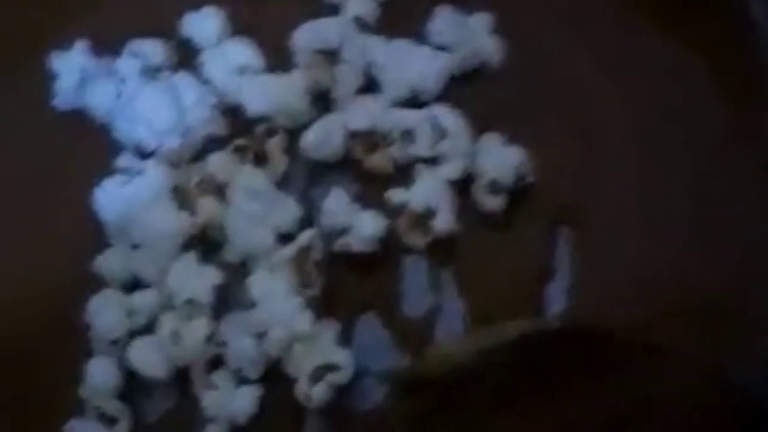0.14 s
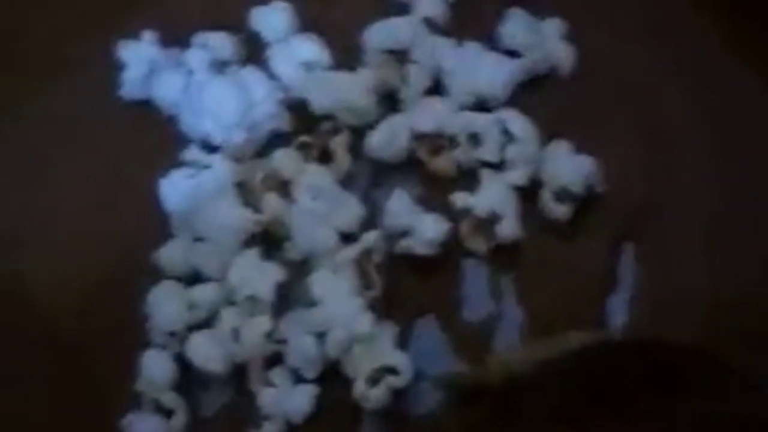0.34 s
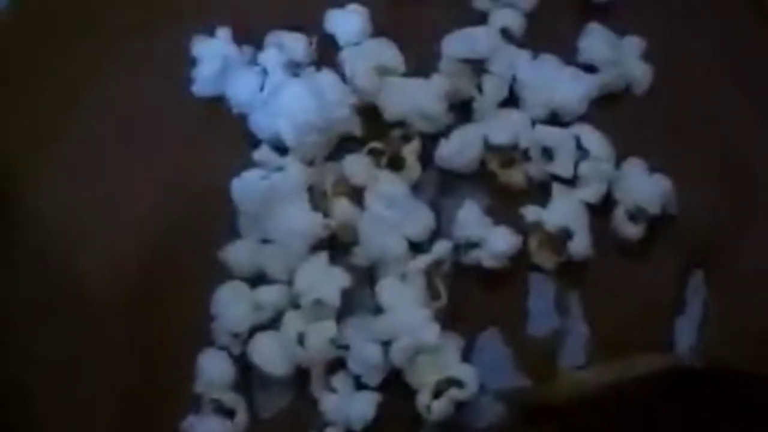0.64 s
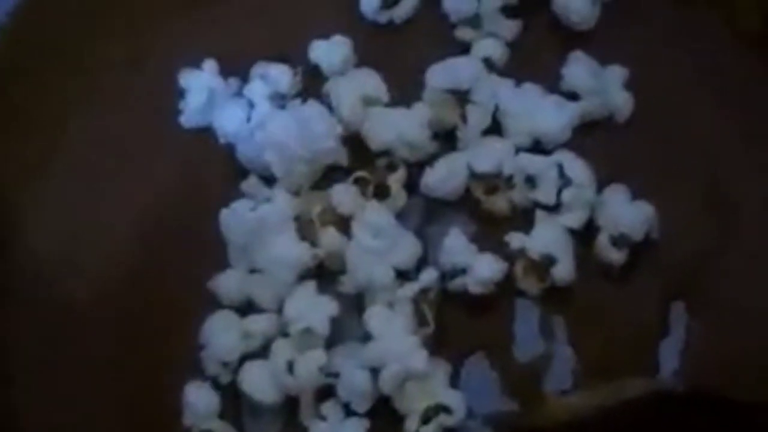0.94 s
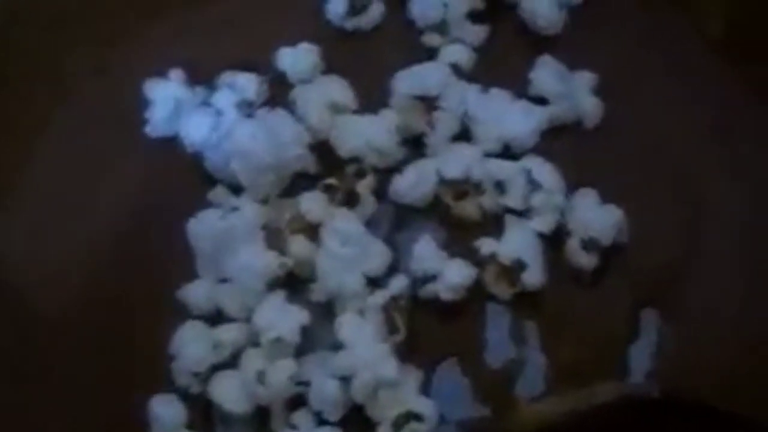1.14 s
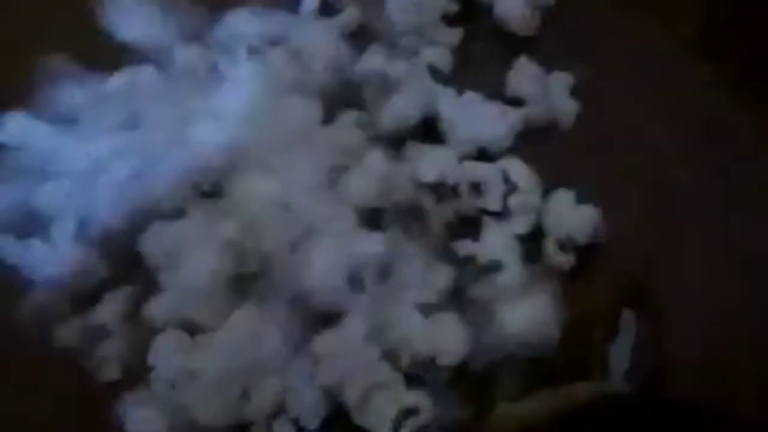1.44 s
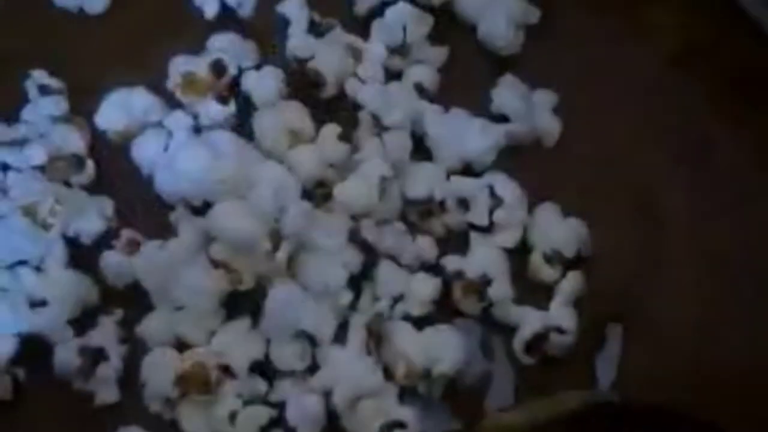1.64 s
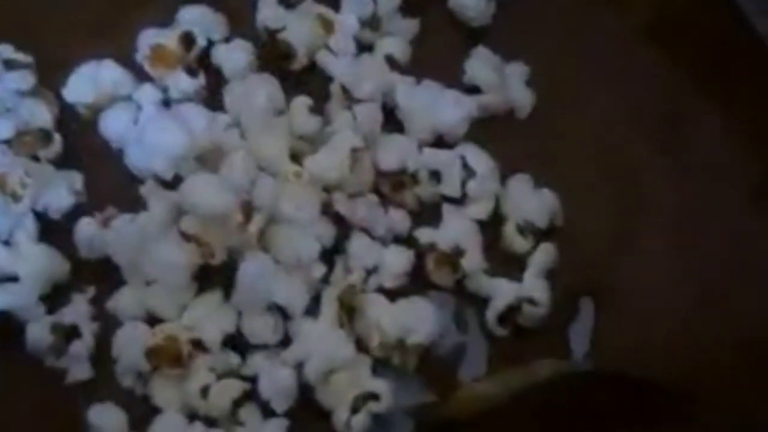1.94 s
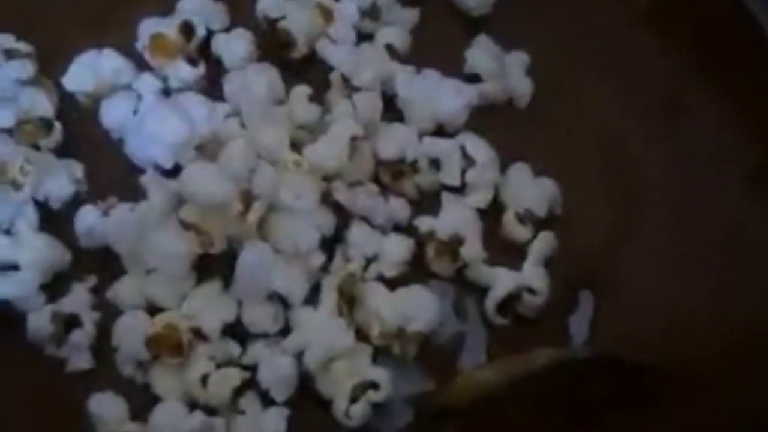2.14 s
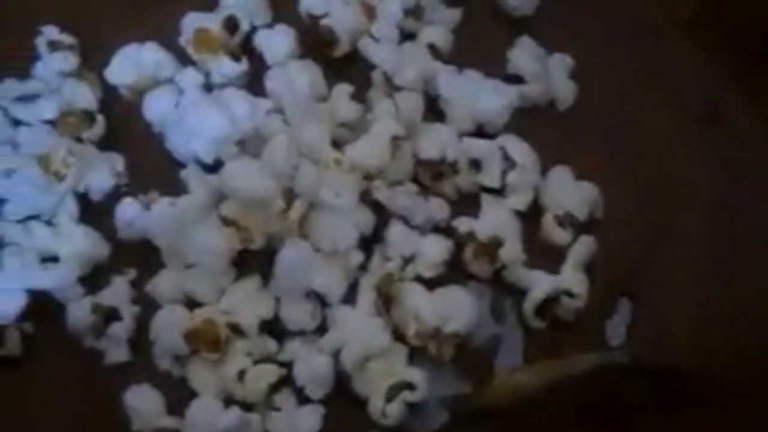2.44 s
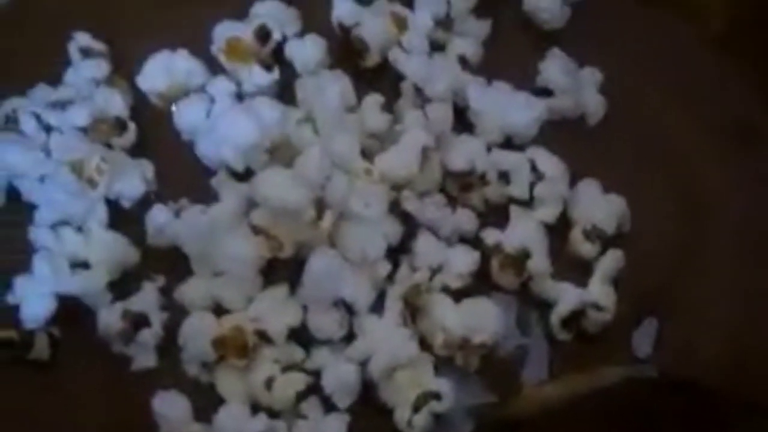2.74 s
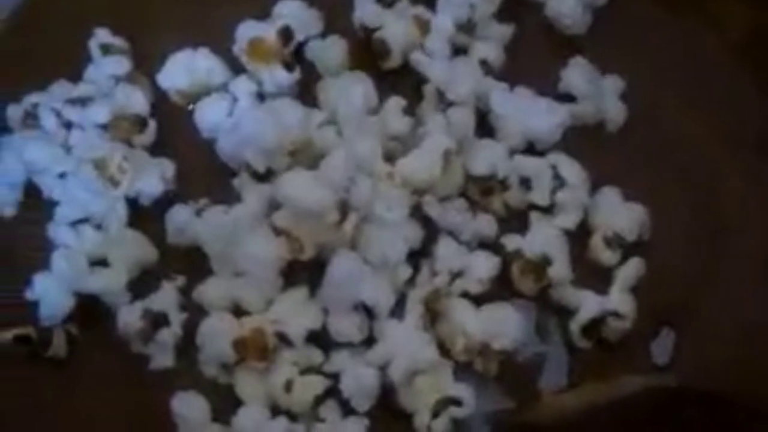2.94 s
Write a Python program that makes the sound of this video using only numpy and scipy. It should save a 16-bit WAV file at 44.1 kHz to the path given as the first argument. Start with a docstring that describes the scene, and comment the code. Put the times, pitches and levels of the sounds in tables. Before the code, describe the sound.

Popcorn rustles and knocks as it is scooped from a metal pot and dropped into a bowl

```python
"""A lone piece lands in a deep bowl, then popcorn is scooped from a metal pot: dense random contacts rustle
and drum, noise bursts click and knock, all coloured by the pot's resonances, and one kernel squeaks.
A handful then drops into the bowl: cracks excite hollow, damped modes. A second scoop follows.
Low thumps go with both scoops. A short diffuse room tail and steady noise last throughout; the sound is
that of a quiet kitchen through a dull, near-mono microphone."""
import sys
import numpy as np
from scipy import signal
from scipy.fft import rfft, irfft
from scipy.io import wavfile
from scipy.ndimage import uniform_filter1d

SR = 44100
rng = np.random.default_rng(int(sys.argv[2]) if len(sys.argv) > 2 else 0)


def field_ratio(decibels):
    """Amplitude ratio for a level in dB (20 dB per decade); scalars and array-likes work."""
    return 10 ** (np.asarray(decibels, dtype=float) / 20)


def dump_mix(stems):
    """Bounce the given channels to the path in sys.argv[1] as a 16-bit WAV at rate SR."""
    frames = np.atleast_2d(stems).T  # one column per channel
    limited = np.clip(frames, -1, 1)  # hard clip at full scale
    pcm = np.round(limited * 32767).astype(np.int16)
    wavfile.write(sys.argv[1], SR, pcm)


N = 136710  # samples, 3.1 s
HZ = np.fft.rfftfreq(4096, 1 / SR)  # frequencies at which filters are given

# Stirring effort, one list per scoop. Columns: t/s, RMS rustle level/dB, RMS drumming level/dB
STIRS = [
    [(.14, -89, -68), (.17, -51.5, -67.5), (.3, -53, -44.5), (.55, -56.5, -52), (.82, -56.5, -54.5),
     (.95, -54.5, -55.5), (1.02, -67, -58.5), (1.13, -72, -64.5), (1.4, -73, -79.5)],
    [(1.87, -76, -99), (1.93, -51, -64), (2.035, -59.5, -56), (2.2, -54.5, -56.5), (2.35, -57.5, -54.5),
     (2.55, -50, -46), (2.7, -59.5, -56), (2.86, -73, -59), (3.0, -83, -74)],
]
# Relative spectrum of the dry rustle, before the pot modes. Columns: f/Hz, density/dB
RUSTLE_SPECTRUM = [(710, -28.5), (1200, -4), (2380, -8.5), (2570, -6), (4670, 0.5), (6440, -5), (7900, -22),
                   (15500, -29)]
# Relative spectrum of the pot wall under drumming and knocks. Columns: f/Hz, density/dB
WALL_SPECTRUM = [(35, -73), (60, -28.5), (258, -15), (381, -19), (613, -3), (1640, -11), (2030, -22.5),
                 (3000, -25), (3900, -52), (6600, -120)]
# Pot resonances. Columns: f/Hz, width/Hz, strength of the peak against the unlifted spectrum/dB
POT_MODES = [(148, 4.4, 9), (629.2, 46, 7.5), (1140, 30, 7), (2320.5, 33, 12.5), (3870, 9.7, 4),
             (1798, 61, 4.5)]
# Crisp slips of kernels along the wall; the first 20 ms have an RMS 12 dB below the level.
# Columns: t/s, level/dB, centre f/Hz, length/s
SLIPS = [(0.1617, -49, 3600, 0.018), (0.2675, -26, 2460, 0.028), (0.3815, -38, 6350, 0.03),
         (0.4115, -33.5, 4940, 0.021), (0.505, -38, 6730, 0.048), (0.5745, -32, 6250, 0.017),
         (0.6035, -30.5, 5550, 0.028), (0.7417, -39.5, 6500, 0.053), (0.8603, -29, 5600, 0.03),
         (0.8976, -35, 4330, 0.028), (1.036, -37, 4000, 0.036), (1.921, -42, 5300, 0.1),
         (2.045, -39.5, 4800, 0.053), (2.067, -35, 4800, 0.014), (2.1005, -37, 4960, 0.0077),
         (2.147, -36, 3870, 0.025), (2.2346, -47, 4400, 0.035), (2.393, -38.5, 4760, 0.06),
         (2.4695, -36, 4480, 0.033), (2.541, -35.5, 3040, 0.009), (2.5501, -27.5, 6100, 0.017),
         (2.628, -30.5, 5560, 0.011), (2.7262, -38, 3700, 0.012), (2.779, -27.5, 5700, 0.024)]
# Relative spectrum of slips and of the crack of landing pieces. Columns: f/Hz, density/dB
SLIP_SPECTRUM = [(350, -39), (600, -1), (2040, -4.5), (2370, -4.5), (2680, -4.5), (6230, 1), (7740, -17),
                 (15500, -31)]
# Dull knocks of the scoop on the pot, level as for slips. Columns: t/s, level/dB, centre f/Hz
KNOCKS = [(0.224, -41, 1130), (0.264, -26, 398), (0.268, -28.5, 1660), (0.286, -45, 980), (0.419, -43, 610),
          (0.604, -37.5, 650), (0.919, -34, 664), (1.038, -39.5, 690), (2.3896, -31, 530),
          (2.392, -33, 1170), (2.469, -33, 600), (2.538, -30.5, 1600), (2.591, -34, 990), (2.617, -38, 650),
          (2.666, -35, 1030), (2.776, -47, 655), (2.832, -43, 740)]
# Pieces landing in the bowl. Columns: t/s, gain on crack and ring (level/dB), hardness from 0 to 1
DROPS = [(0.0988, -50.5, 0.86), (1.431, -52, 0.97), (1.4436, -42, 0.8), (1.4478, -39, 0),
         (1.4563, -41.5, 1), (1.464, -40.5, 1), (1.4696, -33, 0.95), (1.4845, -44, 0.86),
         (1.4883, -40.5, 0.93), (1.512, -40.5, 0.45), (1.5489, -50, 1), (1.613, -56, 1)]
# Bowl modes, before hardness and chance alter them. Columns: f/Hz, level/dB, T60/s
BOWL_MODES = [(468, 0, .17), (510, -14, .03), (865, -7, .035), (925, -5, .04), (1025, -7, .035),
              (1370, -5, .035), (1800, -9, .01), (2500, -11, .012)]
# Low thumps through the counter. Columns: t/s, level before the soft onset/dB, f/Hz
THUMPS = [(0.265, -37, 251.3), (0.266, -46, 398), (0.269, -47.5, 159), (0.92, -54, 160), (2.31, -54.5, 310),
          (2.391, -59, 69), (2.391, -48.5, 246)]
# One kernel squeaking on metal. Columns: t/s, length/s, f/Hz, peak level/dB
SQUEAK = (.78, .04, 1800, -50)
# Relative spectrum of the room's hush. Columns: f/Hz, density/dB
HUSH_SPECTRUM = [(12, -37), (20, -5), (157, -11), (1110, -11), (1960, -11.5), (2380, -8.5), (7000, -7.5),
                 (9100, -51), (15400, -120)]
# Relative spectrum of the preamplifier hiss. Columns: f/Hz, density/dB
PREAMP_SPECTRUM = [(3000, 0), (7500, -14.5), (8800, -3.5), (10300, -3), (15500, -6.5)]
# Relative spectrum of the faint steady noise that differs between left and right. Columns: f/Hz, density/dB
SIDE_SPECTRUM = [(3600, -40), (4600, 9), (7200, 5), (9000, 2), (15700, 1)]


def evened(x):
    """Normalisation: scales a signal to unit RMS."""
    return x / np.sqrt(np.mean(x ** 2) + 1e-20)


def read(points, hz):
    """Interpolation: reads a tabulated spectrum in dB along a logarithmic frequency axis."""
    f, value = np.transpose(points)
    return np.interp(np.log(hz + 1), np.log(f + 1), value)


def add(mix, s, sound):
    """Superposition: adds a sound to the mix from time s on, cut at the end of the mix."""
    part = mix[round(s * SR):][:len(sound)]
    part += sound[:len(part)]


def colour(x, db):
    """Minimum phase: a causal filter whose phase follows from its dB response on HZ by a Hilbert transform."""
    log_gain = np.log(field_ratio(np.maximum(db, -100)))
    full = np.r_[log_gain, log_gain[-2:0:-1]]
    phase = -signal.hilbert(full).imag
    taps = np.fft.ifft(np.exp(full + 1j * phase)).real[:2048]
    return signal.oaconvolve(x, taps)[:len(x)]


def pot_db():
    """Resonance: the peaks in dB that the pot's modes lift out of any spectrum."""
    lift = sum(field_ratio(db) ** 2 / (1 + (2 * (HZ - f) / width) ** 2) for f, width, db in POT_MODES)
    return 10 * np.log10(1 + lift)


def grains(per_s, spread_db):
    """Random impulses: contacts of random sign and size, swelling in clumps."""
    clump_s, clump_db = .025, 2.2
    clump = evened(uniform_filter1d(rng.standard_normal(N), int(clump_s * SR)))
    size_db = spread_db * np.minimum(rng.exponential(1, N), 4) + clump_db * clump
    size = field_ratio(size_db) * rng.choice([-1, 1], N)
    return size * (rng.random(N) < per_s / SR)


def kernels(contacts):
    """Damped oscillation: each contact rings one of many puffed kernels at its own pitch."""
    count, top_hz, t60 = 60, 16000, .014
    t, which = np.arange(1500) / SR, rng.integers(0, count, N)
    pitches = (np.arange(count) + rng.random(count)) * top_hz / count
    out = np.zeros(N)
    for k, hz in enumerate(pitches):
        ring = field_ratio(-60 * t / t60) * np.sin(2 * np.pi * hz * t)
        out += signal.oaconvolve(contacts * (which == k), ring)[:N]
    return out


def stirring():
    """Dense contact noise: a dry rustle of kernels and a drumming on the wall, both following the stir."""
    t, out = np.arange(N) / SR, np.zeros(N)
    rustle_contacts = grains(per_s=12000, spread_db=2.8)
    rustle = evened(colour(kernels(rustle_contacts), read(RUSTLE_SPECTRUM, HZ) + pot_db()))
    drum_contacts = grains(per_s=3000, spread_db=2.6)
    drum = evened(colour(drum_contacts, read(WALL_SPECTRUM, HZ) + pot_db()))
    for s, rustle_db, drum_db in map(np.transpose, STIRS):
        out += field_ratio(np.interp(t, s, rustle_db, -120, -120)) * rustle
        out += field_ratio(np.interp(t, s, drum_db, -120, -120)) * drum
    return out


def bursts(table, spectrum, t60, rise_s):
    """Transient noise: a tick, a chatter sagging over its length, then a decay, coloured about its centre."""
    sag_db, tick_db, tick_s = -3.5, 8.5, .0015
    focus_db, focus_octaves = 5.5, .52
    own_db, own_bins = 3.2, 18  # every burst has its own narrow peaks
    out, t = np.zeros(N), np.arange(6000) / SR
    for s, db, hz, length in table:
        chatter = rng.laplace(size=len(t))
        sag = sag_db * np.minimum(t / length, 1)
        tail = -60 * np.maximum(t - length, 0) / t60
        tick = tick_db * np.exp(-t / tick_s)
        shape = field_ratio(sag + tail + tick) * np.minimum(t / rise_s, 1)
        focus = focus_db * np.exp(-.5 * (np.log2((HZ + 1) / hz) / focus_octaves) ** 2)
        own = own_db * evened(uniform_filter1d(chatter[:len(HZ)], own_bins))
        sound = colour(chatter * shape, read(spectrum, HZ) + pot_db() + focus + own)
        add(out, s, field_ratio(db - 12) * sound / np.sqrt(np.mean(sound[:900] ** 2)))
    return out


def slips():
    """Friction: kernels slip along the wall in crisp bursts with an almost immediate onset."""
    return bursts(SLIPS, SLIP_SPECTRUM, t60=.026, rise_s=.0005)


def knocks():
    """Impact: the scoop knocks dully on the pot, with a softer onset and a longer decay than the slips."""
    length = .016  # s
    return bursts([(*row, length) for row in KNOCKS], WALL_SPECTRUM, t60=.093, rise_s=.0024)


def bowl():
    """Modal excitation: pieces crack, rattle to rest and ring the bowl, harder ones its upper modes more."""
    contact_s, tilt_db_per_octave = .00092, 11
    crack_db, crack_t60 = -8.5, .022
    settle_db, settle_s, rattles_per_s = -17, .03, 400
    out, t = np.zeros(N), np.arange(SR // 4) / SR
    hz, mode_db, t60 = np.transpose(BOWL_MODES)[:, :, None]
    sign = (-1.) ** np.arange(len(BOWL_MODES))[:, None]  # neighbouring modes start in opposite phase
    for s, db, hard in DROPS:
        tilt = tilt_db_per_octave * (hard - .5) * np.log2(hz / hz[0])
        strength = sign * (.46 + .48 * rng.random((len(BOWL_MODES), 1)))
        modes = strength * field_ratio(mode_db + tilt - 60 * t / t60) * np.sin(2 * np.pi * hz * t)
        ring = modes.sum(0) * (1 - np.exp(-t / contact_s))
        noise = evened(colour(rng.random(len(t)) - .5, read(SLIP_SPECTRUM, HZ)))
        landing = ring + field_ratio(crack_db - 60 * t / crack_t60) * noise
        rebounds = (4 * rng.random(len(t)) - 2) * (rng.random(len(t)) < rattles_per_s / SR)
        rattle = field_ratio(settle_db) * np.exp(-t / settle_s) * rebounds
        add(out, s, field_ratio(db) * (landing + signal.fftconvolve(landing, rattle)[:len(t)]))
    return out


def thumps():
    """Damped oscillation: low swings through the counter with a soft start."""
    t60, onset_s = .16, .0063
    out, t = np.zeros(N), np.arange(SR // 2) / SR
    for s, db, hz in THUMPS:
        swing = np.sin(2 * np.pi * hz * t) * (1 - np.exp(-t / onset_s))
        add(out, s, field_ratio(db - 60 * t / t60) * swing)
    return out


def squeak():
    """Pure tone: one kernel squeaks on metal, a sine under a half-sine envelope."""
    out = np.zeros(N)
    s, length, hz, db = SQUEAK
    t = np.arange(0, length, 1 / SR)
    add(out, s, field_ratio(db) * np.sin(np.pi * t / length) * np.sin(2 * np.pi * hz * t))
    return out


def kitchen(x):
    """Reverberation: convolution with a short, diffuse tail of decaying noise."""
    t60, level_db, gap_s = .26, -10, .006
    t = np.arange(SR // 2) / SR
    tail = rng.standard_normal(len(t)) * field_ratio(-60 * t / t60) * (t > gap_s)
    return field_ratio(level_db) * signal.fftconvolve(x, tail / np.linalg.norm(tail))[:N]


def steady_noise(spectrum, db):
    """Stationary noise: a white spectrum shaped to a given colour, at a given RMS level in dB."""
    gain = field_ratio(read(spectrum, np.fft.rfftfreq(N, 1 / SR)))
    return field_ratio(db) * evened(irfft(rfft(rng.standard_normal(N)) * gain, N))


def scene():
    """Superposition: all sources, room tail and noise, with only faint steady noise in the side channel."""
    dry = stirring() + slips() + knocks() + bowl() + thumps() + squeak()
    mid = dry + kitchen(dry) + steady_noise(HUSH_SPECTRUM, -70) + steady_noise(PREAMP_SPECTRUM, -76)
    side = steady_noise(SIDE_SPECTRUM, -80.5)
    return np.array([mid + side, mid - side])


def band_limit(x):
    """A steep low-pass at the top of the band."""
    return signal.sosfilt(signal.butter(12, 15860, fs=SR, output="sos"), x)


def record(dry):
    """Band limitation: a linear-phase low-pass removes the extreme treble."""
    edge_hz = 15750
    lowpass = signal.firwin(511, edge_hz, window=("kaiser", 9), fs=SR)
    mix = signal.oaconvolve(dry, lowpass[None], "same")
    return band_limit(mix)


dry = scene()
out = record(dry)
dump_mix(out)
```